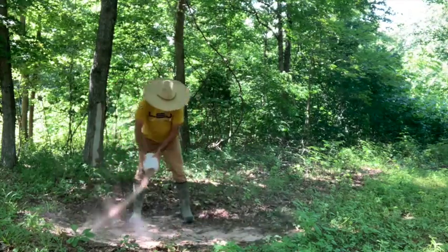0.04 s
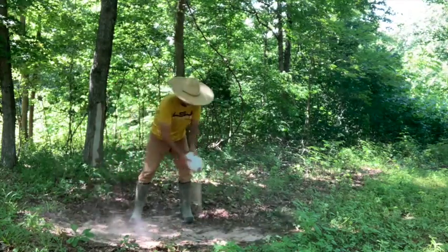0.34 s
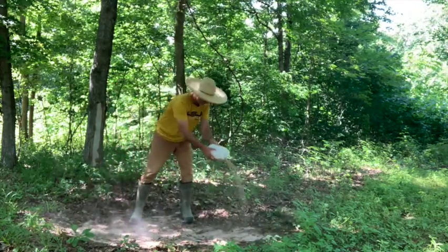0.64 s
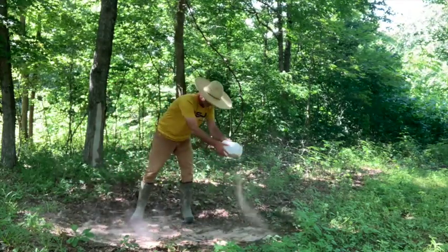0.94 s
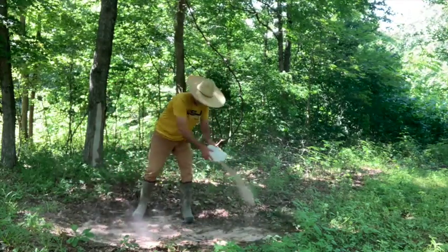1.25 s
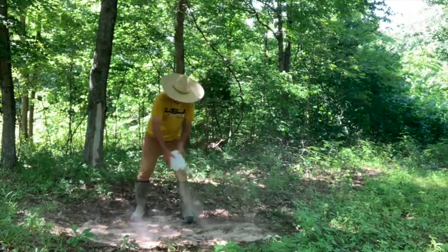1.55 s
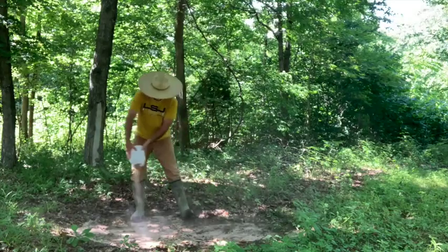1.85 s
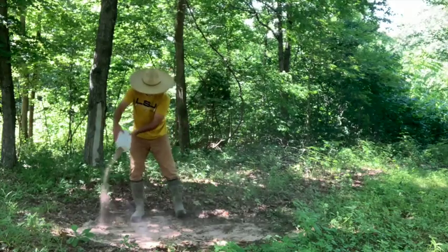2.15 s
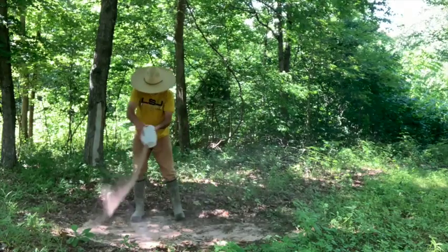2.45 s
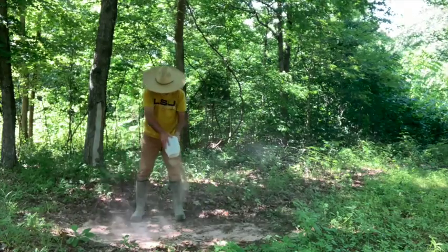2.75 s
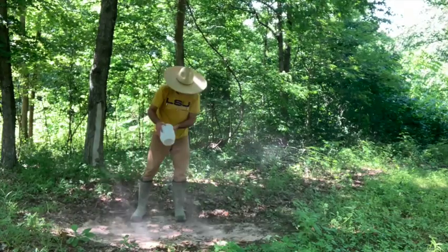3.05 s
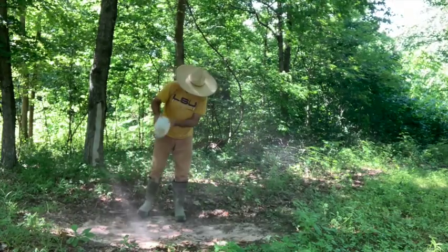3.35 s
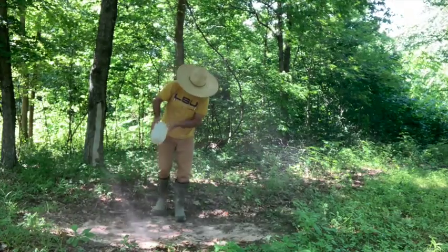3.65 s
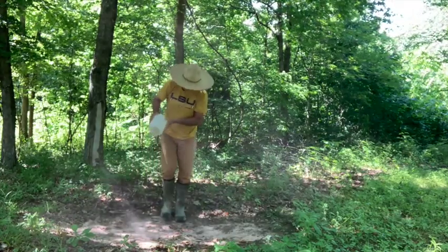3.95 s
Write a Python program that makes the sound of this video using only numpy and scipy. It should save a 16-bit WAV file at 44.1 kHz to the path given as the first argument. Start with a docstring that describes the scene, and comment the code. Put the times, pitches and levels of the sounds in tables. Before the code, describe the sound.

Dry granular mix is shaken from a container a few metres away, pattering and hissing onto dirt and dead leaves in uneven showers. Twigs tick and a boot lands once, over faint tree rustle and distant machinery hum.

```python
"""A dry mineral mix is flung from a container, a few metres away in a woodland clearing.
Each shake showers coarse grains and fine sand onto dirt and dead leaves, with a thin trickle between.
Twigs tick underfoot, a boot lands once, and the trunks throw back a short scatter.
Behind it all the trees rustle faintly over a far rumble and the hum of distant machinery."""
import sys
import numpy as np
from scipy import signal
from scipy.fft import rfft, irfft, next_fast_len
from scipy.io import wavfile
from scipy.ndimage import uniform_filter1d, map_coordinates

SR = 44100
rng = np.random.default_rng(int(sys.argv[2]) if len(sys.argv) > 2 else 0)


def to_wav(s):
    """Save 16-bit WAV."""
    ch = np.atleast_2d(s).T  # columns
    pcm = np.round(np.clip(ch, -1, 1) * 32767)  # PCM
    wavfile.write(sys.argv[1], SR, pcm.astype(np.int16))


N = 176400

# showers: full flow t/s, attack over the last 20 dB/s, hold/s, release to -60 dB/s,
# grains on leaves/dB, grains on dirt/dB, sand/dB, leaf ring f/Hz, leaf ring/dB
SHOWER_CUES = [(.083, .014, .01, .11, -41.5, -66, -40, 4150, -47),
               (.123, .02, .013, .3, -51, -51.5, -42.8, 3800, -51),
               (.154, .015, .006, .16, -48.5, -52, -54, 2900, -52),
               (.288, .06, .008, .21, -46, -54.5, -39.8, 5050, -52),
               (.545, .04, .01, .2, -69, -75, -57, 7000, -74),
               (.645, .05, .025, .5, -59, -65, -52, 6800, -65),
               (.838, .03, .02, .3, -59, -65, -58, 5500, -64),
               (1.02, .04, .03, .4, -63, -67, -61, 4000, -68),
               (1.15, .03, .03, .4, -64, -67, -62, 4000, -69),
               (1.37, .018, .008, .18, -57, -64, -44, 4200, -63),
               (1.428, .025, .008, .14, -62, -68, -47, 6000, -67),
               (1.475, .03, .025, .35, -61, -66, -52, 4500, -66),
               (1.665, .026, .012, .15, -41.5, -53, -38.7, 4450, -50),
               (1.688, .016, .01, .15, -44, -49.5, -42, 4900, -51),
               (1.829, .012, .012, .2, -53, -65, -47.5, 5000, -57),
               (1.98, .04, .02, .2, -63, -66, -52.5, 4500, -68),
               (2.022, .022, .016, .32, -46, -55, -38.5, 3730, -47),
               (2.182, .06, .016, .22, -54.5, -55, -44, 3300, -56.5),
               (2.237, .03, .012, .24, -56, -59, -51, 3700, -61),
               (2.54, .04, .008, .22, -55, -60, -45.5, 3700, -59),
               (2.585, .04, .045, .32, -54, -59, -48.5, 4800, -59),
               (2.83, .08, .08, .4, -68, -73, -62, 4000, -72),
               (2.932, .009, .005, .1, -57.5, -65, -48, 7000, -63),
               (2.98, .03, .02, .3, -61, -65, -62, 3500, -65),
               (3.02, .02, .02, .33, -60, -66, -49.5, 4500, -64),
               (3.386, .008, .006, .05, -62, -61, -52.5, 7000, -63),
               (3.965, .02, .01, .15, -65, -69, -63, 3500, -68)]
# fader for the trickle between showers: t/s, level/dB
TRICKLE_FADER = [(0, -60.5), (.22, -55), (.36, -59), (.48, -69), (.77, -67), (.95, -68.5), (1.2, -64),
                 (1.32, -67.5), (1.56, -62), (1.78, -57), (1.92, -62.5), (2.13, -60), (2.33, -62),
                 (2.41, -76), (2.45, -72), (2.5, -60), (2.76, -68), (2.99, -56), (3.16, -63), (3.37, -65.5),
                 (3.47, -70), (3.57, -59.5), (3.7, -85), (4, -75)]
# EQ of grains on leaves, grains on dirt and fine sand: f/Hz, level/dB
LEAF_EQ = [(150, -58), (500, -24), (900, -31), (1500, -12.5), (2400, -7), (3700, -4.5), (5000, 2),
           (7000, -0.5), (10000, -6), (15000, -14.5)]
DIRT_EQ = [(150, -11), (450, -4), (850, -8), (1500, -4), (2500, -4.5), (3500, -2.5), (6000, -10)]
SAND_EQ = [(1000, -40), (3000, -57), (5000, -23), (7000, -4), (9000, -0.5), (11500, -.5), (13500, -2.5),
           (15500, -8)]
# EQ of the treetop rustle and the far rumble: f/Hz, level/dB
RUSTLE_EQ = [(60, -34), (200, -0.5), (400, 1), (600, -1.5), (850, -3), (1400, -6), (2200, -8), (3300, -8),
             (5000, -12.5), (7500, -14.5), (11000, -59), (15500, -58)]
RUMBLE_EQ = [(20, -29), (38, -15), (48, -15), (60, -3.5), (75, -1), (100, -6), (150, -8), (210, -15),
             (400, -38.5), (1000, -51)]
# steady machine tones: f/Hz, level/dB
HUM_TONES = [(59.3, -58), (88.3, -61.5), (148.2, -65), (296.8, -75), (444.7, -76)]
# fader for the low machine drone: t/s, level/dB
DRONE_FADER = [(0, -69), (.7, -66), (1.05, -58.5), (1.45, -53), (1.8, -59.5), (2.1, -63), (2.5, -67),
               (3.1, -62), (4, -68)]
# twigs and leaves underfoot: t/s, level/dB, f/Hz, decay to -60 dB/s, resonance Q
TWIG_CUES = [(.26, -46, 11000, .02, 1), (.816, -50, 9000, .015, 1), (1.6412, -39.5, 10500, .02, 1),
             (1.8058, -41.5, 9500, .025, 1), (1.8125, -41, 10000, .015, 1), (1.8262, -39, 10000, .015, 1),
             (1.9903, -41.5, 3300, .02, 2.5), (1.991, -43.5, 1600, .025, 4), (2.63, -47, 5300, .04, 1.5),
             (3.386, -52, 3400, .04, 10), (3.39, -50.5, 4150, .05, 16), (3.5119, -39.5, 9000, .012, .8),
             (3.517, -45.5, 7000, .014, 1), (3.5585, -46.5, 5400, .016, 1.5),
             (3.6125, -44.5, 2900, .022, 3), (3.8646, -51, 1900, .035, 2)]
# EQ of the sole on dirt: f/Hz, level/dB
SCUFF_EQ = [(100, -18), (250, 1), (520, -1), (800, -9), (1200, -11), (2000, -18), (8000, -35)]
# partials of the heel knock: f/Hz, relative level/dB
HEEL_PARTIALS = [(270, 0), (420, -3), (620, -1), (1080, -4), (1330, -9)]
# stereo image of foreground and background: f/Hz, left-right correlation (clipped to -1..1)
NEAR_IMAGE = [(300, 0.71), (800, -0.28), (1500, 0.47), (3100, 0.57), (5000, -0.12), (6700, -0.16),
              (7600, -0.79), (8600, -1), (9600, -1), (10600, -0.62), (11600, 0.47), (12400, 0.85),
              (13000, 1)]
FAR_IMAGE = [(60, 0.91), (130, 0.56), (250, 0.26), (450, -0.021), (750, -0.44), (1300, -0.049),
             (2200, 0.0024), (3500, 0.32), (6000, 0.24), (7300, -0.87), (11500, -1.06), (13000, .99)]
# background pan, leaning left in the bass: f/Hz, left minus right/dB
FAR_PAN = [(60, 1), (150, 2.5), (350, 4), (700, 2), (1300, -2), (4000, 0.5), (9000, -1.5)]


def amp(db):
    """Decibels to gain."""
    return 10 ** (np.asarray(db) / 20)


def unit(x):
    """Scale to rms 1."""
    return x / np.sqrt(np.mean(x ** 2) + 1e-20)


def along(points, hz):
    """Read (f/Hz, value) points on a log frequency axis."""
    f, v = np.transpose(points)
    return np.interp(np.log(hz + 1), np.log(f + 1), v)


def fader(points):
    """Ramp through (t/s, value) points, one value a sample."""
    return np.interp(np.arange(N) / SR, *np.transpose(points))


def wobble(per_s):
    """Smooth random modulation, per_s knots a second."""
    knots = rng.standard_normal(int(N * per_s / SR) + 4)
    return map_coordinates(knots, [np.arange(N) * per_s / SR])


def filtered(x, response):
    """Zero-phase filter with gain response(hz)."""
    m = next_fast_len(N + SR // 2)
    return irfft(rfft(x, m) * response(np.fft.rfftfreq(m, 1 / SR)), m)[..., :N]


def coloured(x, eq):
    """x through an EQ curve, at rms 1."""
    return unit(filtered(x, lambda hz: amp(along(eq, hz))))


def stereo(pair, image):
    """Use two unrelated signals as mid and side, balanced for the image's correlation."""
    angle = lambda hz: np.arccos(np.clip(along(image, hz), -1, 1)) / 2
    mid, side = filtered(pair, lambda hz: np.array([np.cos(angle(hz)), np.sin(angle(hz))]))
    return np.array([mid + side, mid - side])


def patchy(x, depth_db=3, size=5):
    """Shifting peaks and dips of colour, a few hundred Hz wide and tens of ms long; rms 1."""
    spectra = signal.stft(x, nperseg=512)[2]
    patches = uniform_filter1d(rng.standard_normal(spectra.shape[1:]), size, axis=0)
    patches = uniform_filter1d(patches, size * 2, axis=1)
    return unit(signal.istft(spectra * amp(depth_db * unit(patches)), nperseg=512)[1][:, :N])


def impacts(eq, per_s, spread_db):
    """Two streams of tiny random hits of scattered size, at rms 1."""
    hit = rng.random((2, N)) < per_s / SR
    size = amp(spread_db * np.clip(rng.standard_normal((2, N)), -2, 2))
    return coloured(hit * size * rng.choice([-1, 1], (2, N)), eq)


def pouring(leaf_q=13, min_release_s=.06):
    """With each shake, grains patter down and ring the leaves while sand hisses; strays trickle on."""
    t = np.arange(N) / SR
    grains = lambda eq: impacts(eq, per_s=5000, spread_db=4.5)
    patter = patchy(grains(LEAF_EQ))  # grains keep meeting other leaves, so the colour shifts
    thuds = patchy(grains(DIRT_EQ))
    leaf_hits = grains(LEAF_EQ)
    power, ring = np.zeros((3, N)), np.zeros((2, N))
    for at, attack, hold, release, leaf_db, dirt_db, sand_db, ring_hz, ring_db in SHOWER_CUES:
        attack_db = -20 * np.maximum(at - t, 0) / attack
        release_db = -60 * np.maximum(t - at - hold, 0) / max(release, min_release_s)
        flow = amp(np.maximum(attack_db + release_db, -200))
        power += np.outer(amp([leaf_db, dirt_db, sand_db]), flow) ** 2
        leaf_tone = unit(signal.lfilter(*signal.iirpeak(ring_hz, leaf_q, SR), leaf_hits))
        ring += flow * amp(ring_db) * leaf_tone
    leaf_gain, dirt_gain, sand_gain = np.sqrt(power)  # overlapping showers add in power
    hiss = patchy(impacts(SAND_EQ, per_s=14000, spread_db=3.5))
    strays = amp(fader(TRICKLE_FADER)) * patchy(impacts(SAND_EQ, per_s=1700, spread_db=3.5))
    return leaf_gain * patter + dirt_gain * thuds + ring + sand_gain * hiss + strays


def settling(level_db=-75):
    """Single crumbs drop through the leaf litter in sparse, faint ticks."""
    return amp(level_db) * patchy(impacts(LEAF_EQ, per_s=78, spread_db=6.5), depth_db=5)


def trunks(x, send_db=-11, t60_s=.36):
    """A thin, short reverb: sound scattering off the surrounding trees."""
    t = np.arange(SR // 2) / SR
    tail = rng.standard_normal((2, len(t))) * amp(-60 * t / t60_s)
    return amp(send_db) * signal.fftconvolve(x, tail / np.linalg.norm(tail[0]), axes=1)[:, :N]


def forest(rustle_db=-56, rumble_db=-55):
    """The ambience bed: faint leaf rustle over a far rumble."""
    rustle = patchy(coloured(rng.standard_normal((2, N)), RUSTLE_EQ), depth_db=1.96, size=3)
    rumble = coloured(rng.standard_normal((2, N)), RUMBLE_EQ)
    return stereo(amp(rustle_db) * rustle + amp(rumble_db) * rumble, FAR_IMAGE)


def machinery(drone_hz=117.5, drift_rad=.39, waver_db=2, flutter_db=2.5):
    """Far steady tones waver on the way; one low, fluttering drone swells and recedes."""
    t = np.arange(N) / SR
    tone = lambda hz: np.sqrt(2) * np.sin(2 * np.pi * hz * t + drift_rad * wobble(7))
    hum = sum(amp(db + waver_db * wobble(10)) * tone(hz) for hz, db in HUM_TONES)
    drone = amp(fader(DRONE_FADER) + flutter_db * wobble(30)) * tone(drone_hz)
    return hum + drone


def twigs():
    """Short cracks, each through one resonance: broad for a snap, narrow for a stiff leaf."""
    out, t = np.zeros((2, N + SR)), np.arange(SR // 8) / SR
    for at, db, hz, t60, q in TWIG_CUES:
        crack = unit(signal.lfilter(*signal.iirpeak(hz, q, SR), rng.standard_normal((2, len(t)))))
        start = round(at * SR)
        out[:, start:start + len(t)] += crack * amp(db - 60 * t / t60)
    return out[:, :N]


def boot(at_s=1.524, scuff_db=-52.5, scuff_t60_s=.09, heel_db=-44.5, heel_t60_s=.036):
    """The sole scuffs the dirt, then the heel lands with one dull knock."""
    age = np.arange(N) / SR - at_s
    scuff_gain = (age > 0) * amp(scuff_db - 60 * np.abs(age) / scuff_t60_s)
    scuff = scuff_gain * coloured(rng.standard_normal((2, N)), SCUFF_EQ)
    heel_age = np.maximum(age - .0045, 0)  # just behind the sole
    knock = sum(amp(db) * np.sin(2 * np.pi * hz * heel_age) for hz, db in HEEL_PARTIALS)
    return stereo(scuff, NEAR_IMAGE) + amp(heel_db - 60 * heel_age / heel_t60_s) * knock


def scene():
    """The mix: pour, twigs and footstep up front, forest and machinery behind."""
    near = pouring() + twigs() + settling()
    pan = lambda hz: amp(np.outer([.5, -.5], along(FAR_PAN, hz)))
    far = filtered(forest() + machinery(), pan)
    return stereo(near + trunks(near), NEAR_IMAGE) + boot() + far


def record(dry, top_hz=15900):
    """A brick-wall high cut on the whole mix."""
    return filtered(dry, lambda hz: hz < top_hz)


dry = scene()
out = record(dry)
to_wav(out)
```